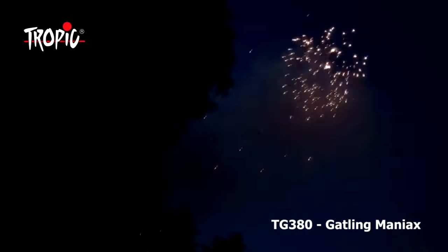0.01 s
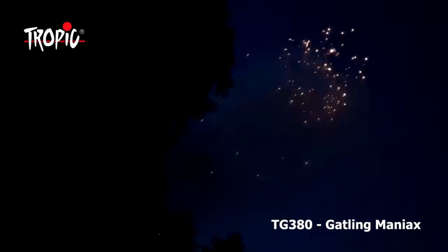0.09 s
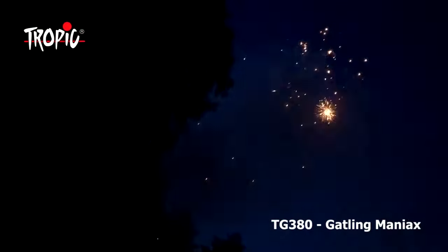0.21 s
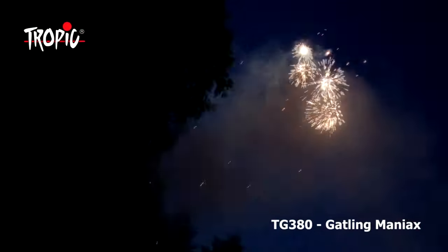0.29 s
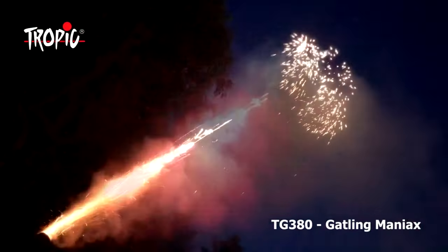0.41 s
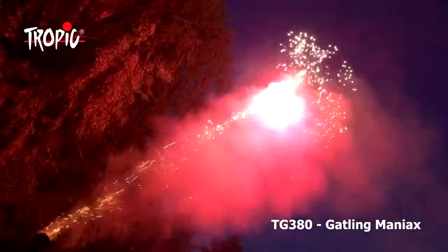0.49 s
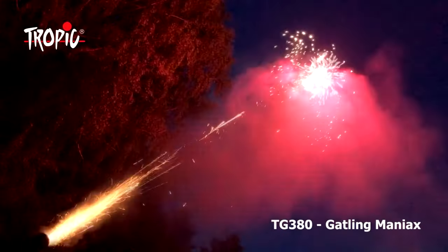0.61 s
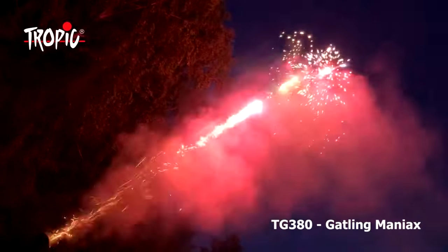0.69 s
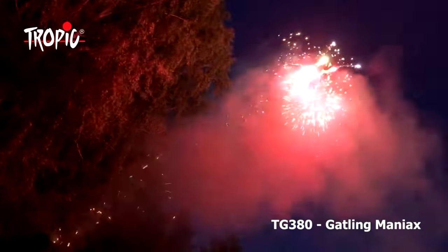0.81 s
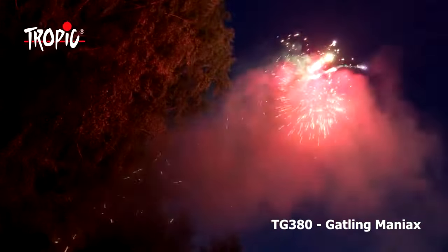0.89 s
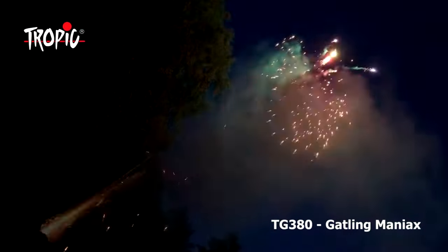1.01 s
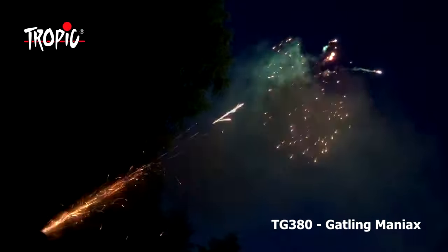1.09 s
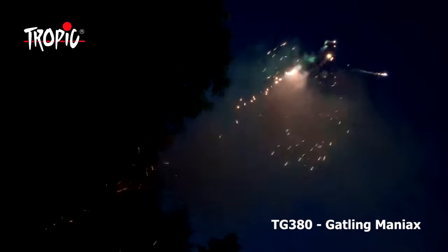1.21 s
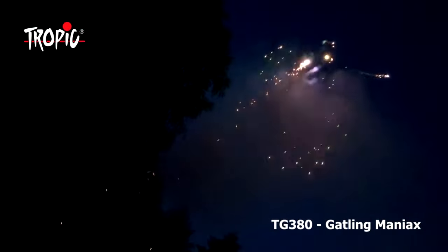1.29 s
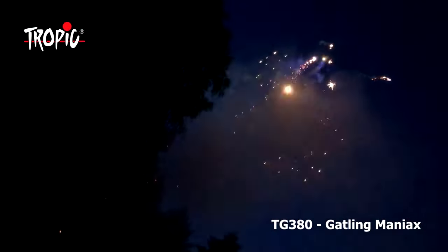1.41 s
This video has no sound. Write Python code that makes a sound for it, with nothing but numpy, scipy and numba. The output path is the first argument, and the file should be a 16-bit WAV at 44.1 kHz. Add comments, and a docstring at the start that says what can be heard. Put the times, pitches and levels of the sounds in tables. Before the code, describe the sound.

A multi-shot firework fires outdoors at night. Loud thumping launches and dry overhead cracks come in quick, uneven clusters, then thin out. Each bang leaves a short hissing echo from the surrounding trees.

```python
"""Multi-shot firework at night

Each launch is a short tearing rush of gas that ends in a report and a thump; stars burst overhead
with dry cracks. Trees scatter it all back as a hissing echo over a faint rumble. A limiter ducks
after each bang, and the bass lags the treble, so every crack chirps downward."""
import sys
import numpy as np
from scipy import signal
from scipy.fft import rfft, irfft, next_fast_len
from scipy.io import wavfile
from scipy.ndimage import minimum_filter1d
from numba import njit

SR = 44100
rng = np.random.default_rng(int(sys.argv[2]) if len(sys.argv) > 2 else 0)


def generate_wav(sig):
    """Save sig (samples, or channels by samples) to the path in sys.argv[1] as 16-bit PCM at SR."""
    pcm = np.round(np.clip(np.atleast_2d(sig).T, -1, 1) * 32767).astype(np.int16)
    wavfile.write(sys.argv[1], SR, pcm)


N = 63945
T = np.arange(N) / SR
N_FFT = 2 * next_fast_len(N)
HZ = np.maximum(np.fft.rfftfreq(N_FFT, 1 / SR), 1e-3)

# Launches: rush start/s, report t/s, report/dB, report bass/dB, rush/dB, puff/dB re rush,
# tube ring f/Hz, ring/dB re rush, thump f/Hz, thump/dB, echo/dB
LAUNCHES = [(0.252, 0.2636, 11, 7.5, -12, -3, 1980, -19, 111, -10, -24),
            (0.2766, 0.2865, 27.5, -8.5, -13, -4.5, 1990, -11, 81.5, -3, -21.5),
            (.4908, 0.498, 17.5, 4, -11.5, -6, 2000, -8, 68, -11.5, -25.5),
            (0.5269, 0.5372, 11, 7, -11.5, -5.5, 2140, -4, 74.5, -20, -28),
            (0.935, .9460, 12, 4, -14, -2.5, 1730, -12.5, 89.5, -17, -29.5)]
# Star bursts: t/s, crack/dB, body below 1.3 kHz/dB, treble edge f/Hz, echo/dB
BURSTS = [(0.0747, -20.5, -3, 12000, -57), (.1418, -18, -6, 12800, -70), (.2073, 13, -9, 7850, -25.5),
          (0.2153, 15.5, 9.5, 11800, -54), (0.2368, 20, 1.5, 12700, -41), (.5914, 20, -2, 10600, -25.5),
          (0.607, -5, 2, 2500, -40), (0.706, -2, 3, 2240, -35), (.7209, 19.5, 3, 10800, -24),
          (1.13, -17.5, 2.5, 11900, -53), (1.1736, -11, -11, 13200, -57.5), (1.3871, -4.5, 9, 7900, -46),
          (1.3922, -7.5, -6, 9000, -50.5), (1.3944, -1.5, -12, 7400, -57), (1.3974, -2, -9, 7160, -55),
          (1.4278, 11.5, -7.5, 7260, -41.5)]


def undb(db):
    """Decibels to gain."""
    return 10 ** (np.asarray(db) / 20)


def curve(points):
    """(f/Hz, value) points interpolated over log frequency."""
    hz, values = np.array(points, float).T
    return np.interp(np.log(HZ), np.log(hz), values)


def noise(gain):
    """Unit-rms noise with the given gain per frequency."""
    x = irfft(rfft(rng.standard_normal(N_FFT)) * gain)[:N]
    return x / x.std()


def pulse(at_s, gain, ground_lag_s=0.001232, ground_db=-11, ground_edge_hz=6700):
    """Causal pressure pulse, followed by its duller reflection off the ground."""
    cepstrum = irfft(np.log(gain + 1e-6))
    cepstrum[1:N_FFT // 2] *= 2  # fold to minimum phase
    cepstrum[N_FFT // 2 + 1:] = 0
    direct = np.exp(rfft(cepstrum) - 2j * np.pi * HZ * round(at_s * SR) / SR)
    ground = undb(ground_db) * np.exp(-2j * np.pi * HZ * ground_lag_s) / (1 + (HZ / ground_edge_hz) ** 2)
    return irfft(direct * (1 + ground))[:N]


def gas_rush(start_s, end_s, level_db, puff_db, ring_hz, ring_db):
    """Gas leaks, then tears out for about 10 ms with a low puff and rings the tube."""
    rush_spectrum = [(30, -22), (60, -14), (130, 5.5), (300, 1.5), (600, -4), (1100, -4.5), (1600, 0.5),
                     (2400, 1), (3100, -7), (4500, -5), (6500, -5), (9000, -8.5), (15500, -14)]  # tearing gas: f/Hz, level/dB
    puff_spectrum = [(25, -25), (60, -6), (130, 3.5), (240, -2.5), (450, -15.5), (1200, -32), (16000, -68)]  # low puff: f/Hz, level/dB
    leak_db, leak_rise_s = -17, 0.004
    attack_s, release_s, ring_width_hz = 0.0005, 0.0018, 220
    before_s, after_s = np.maximum(start_s - T, 0), np.maximum(T - end_s, 0)
    leak = undb(leak_db) * np.exp(-before_s / leak_rise_s)
    envelope = np.maximum(np.exp(-before_s / attack_s), leak) * np.exp(-after_s / release_s)
    grain_db = 2.5 * np.interp(T, np.linspace(0, T[-1], N // 40), rng.standard_normal(N // 40))
    sag_db = 4.5 * np.clip((T - start_s) / (end_s - start_s), 0, 1)
    ring = undb(ring_db) * noise(1 / (1 + (2 * (HZ - ring_hz) / ring_width_hz) ** 2))
    tear = noise(undb(curve(rush_spectrum)))
    puff = undb(puff_db) * noise(undb(curve(puff_spectrum)))
    return (tear + puff + ring) * envelope * undb(level_db - sag_db + grain_db)


def launches(thump_rise_s=0.0035, thump_decay_s=0.0083):
    """A sharp report ends each gas rush; the air swings back in a low thump."""
    report_spectrum = [(30, -16), (100, 0.5), (250, 13), (600, 5.5), (1100, -1), (1800, 4.5), (3500, -8.5),
                       (8000, -11), (16000, -14.5)]  # launch report: f/Hz, level/dB
    out = 0
    for (start_s, at_s, report_db, bass_db, rush_db, puff_db,
         ring_hz, ring_db, thump_hz, thump_db, _) in LAUNCHES:
        rush = gas_rush(start_s, at_s, rush_db, puff_db, ring_hz, ring_db)
        shelf_db = bass_db / (1 + (HZ / 400) ** 2)
        report = pulse(at_s, undb(report_db + curve(report_spectrum) + shelf_db))
        age_s = np.maximum(T - at_s, 0)
        envelope = (1 - np.exp(-age_s / thump_rise_s)) * np.exp(-age_s / thump_decay_s)
        thump = undb(thump_db) * envelope * np.sin(2 * np.pi * thump_hz * age_s)
        out += rush + report + thump
    return out


def stars():
    """Each star bursts in one pressure pulse, a dry crack."""
    crack_spectrum = [(40, -19), (150, -6), (400, 0), (800, -0.5), (1600, 1.5), (2700, -6.5), (4000, 1.5),
                      (6000, -6), (8000, -5.5), (16000, -16)]  # star crack: f/Hz, level/dB
    out = 0
    for at_s, crack_db, body_db, edge_hz, _ in BURSTS:
        shelf_db = body_db / (1 + (HZ / 1300) ** 2)
        lowpass = 1 / np.sqrt(1 + (HZ / edge_hz) ** 8)
        out += pulse(at_s, undb(crack_db + curve(crack_spectrum) + shelf_db) * lowpass)
    return out


def echo_envelope(age_s, t60_s, delay_s=0.0032, rise_s=0.0078):
    """Short delay, linear rise, exponential decay."""
    rise = np.clip((age_s - delay_s) / rise_s, 0, 1)
    return rise * np.exp(-np.log(1000) * np.maximum(age_s, 0) / t60_s)


def scatter(events, spectrum, decays):
    """Diffuse echoes of (t/s, level/dB) events; each band dies at its own rate."""
    hiss = rfft(noise(undb(curve(spectrum))), N_FFT)
    out = 0
    for band_hz, t60_s in decays:
        band = curve([(hz, hz == band_hz) for hz, _ in decays])
        power = sum((undb(db) * echo_envelope(T - at_s, t60_s)) ** 2 for at_s, db in events)
        out += irfft(hiss * band)[:N] * np.sqrt(power)
    return out


def trees(near_db=7, near_t60_s=0.11):
    """Trees scatter launches and bursts back as hiss; the first scatter is near the launcher."""
    shot_spectrum = [(30, -14), (60, -3.5), (140, 4.5), (240, 1.5), (400, -5.5), (900, -4), (1800, 0),
                     (3000, -1.5), (6000, 2.5), (10000, 0), (15500, -2.5)]  # launch echo: f/Hz, level/dB
    star_spectrum = [(40, -25), (150, -6), (400, -8.5), (900, -5), (1800, -1.5), (2800, -4), (4500, -1.5),
                     (7000, -7), (10000, -14.5), (15500, -22)]  # burst echo: f/Hz, level/dB
    shot_decays = [(60, 1.43), (200, 1.36), (500, 0.63), (2000, 0.6), (6000, 0.5), (14000, 0.31)]  # launch echo decay: f/Hz, T60/s
    star_decays = [(100, .8), (600, 0.82), (2000, 0.82), (5000, 0.57), (14000, 0.44)]  # burst echo decay: f/Hz, T60/s
    shots = [(at_s, echo_db) for _, at_s, *_, echo_db in LAUNCHES]
    bursts = [(at_s, echo_db) for at_s, *_, echo_db in BURSTS]
    bursts.append((-0.22, -27.5))  # an earlier burst, still dying away
    near_envelope = sum(undb(db + near_db) * echo_envelope(T - at_s, near_t60_s) for at_s, db in shots)
    near = noise(undb(curve(shot_spectrum))) * near_envelope
    return near + scatter(shots, shot_spectrum, shot_decays) + scatter(bursts, star_spectrum, star_decays)


def night(level_db=-55):
    """Faint, steady outdoor rumble."""
    rumble_spectrum = [(25, -26), (60, -2.5), (140, -8.5), (240, 7), (350, -7.5), (800, -9), (1800, -9),
                       (3000, -13), (5000, -15), (9000, -23.5), (15500, -29)]  # night air: f/Hz, level/dB
    return undb(level_db) * noise(undb(curve(rumble_spectrum)))


def scene():
    """Launches, bursts and their echoes over the rumble; mono."""
    return (launches() + stars() + trees() + night())[None]


@njit
def limiter_gain(allowed, release_s):
    """Gain that drops at once and recovers gradually."""
    out, gain = np.empty(len(allowed)), 1.0
    for i in range(len(allowed)):
        gain = min(allowed[i], gain + (1 - gain) / (release_s * SR))
        out[i] = gain
    return out


def record(dry):
    """Fast limiter with a short hold, bass lag, rounded peaks, steep top cut."""
    ceiling_db, hold_s, clip_db, top_hz = 2, 0.0098, -1.6, 16000
    lag_cycles, lag_corner_hz = 1.2, 50
    half_hold = int(hold_s * SR / 2)
    allowed = np.minimum(1, undb(ceiling_db) / (np.abs(dry[0]) + 1e-9))
    held = minimum_filter1d(allowed, size=2 * half_hold + 1, origin=half_hold - 8)  # 8 samples ahead
    limited = dry[0] * limiter_gain(held, release_s=0.0011)
    lag_rad = 2 * np.pi * lag_cycles * np.log1p(HZ / lag_corner_hz)  # delay = cycles / (f + corner)
    chirped = irfft(rfft(limited, N_FFT) * np.exp(-1j * lag_rad))[:N]
    rounded = chirped / (1 + (chirped / undb(clip_db)) ** 8) ** (1 / 8)
    top_cut = signal.ellip(10, 0.2, 80, top_hz, fs=SR, output="sos")
    return signal.sosfilt(top_cut, rounded)[None]


dry = scene()
out = record(dry)
generate_wav(out)
```